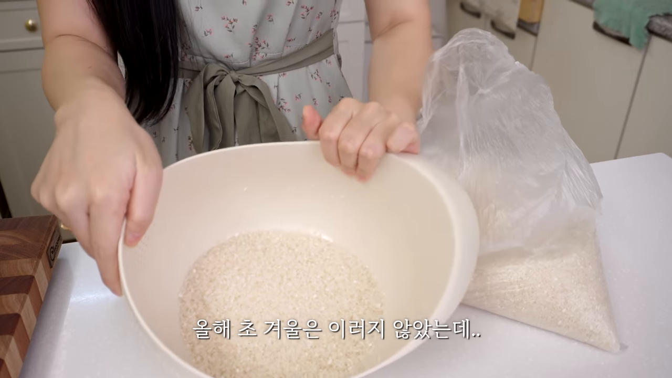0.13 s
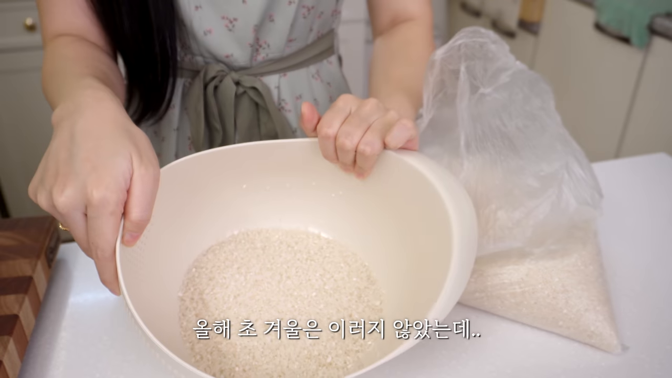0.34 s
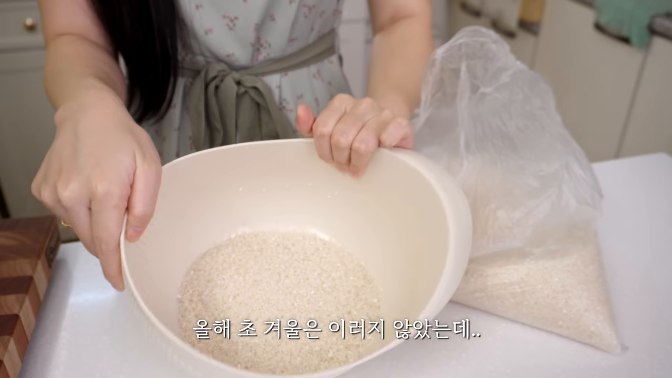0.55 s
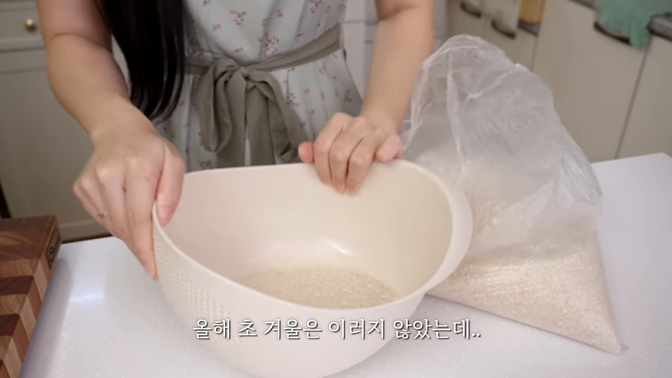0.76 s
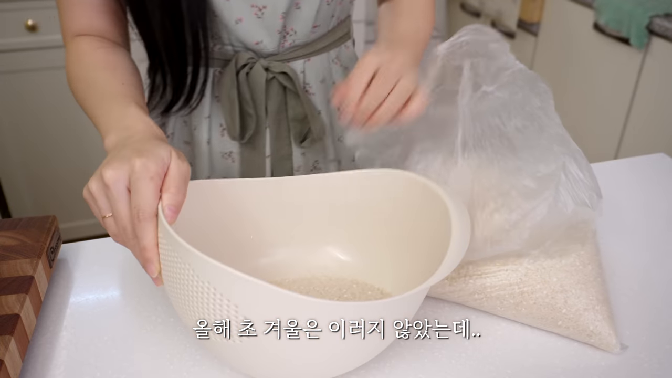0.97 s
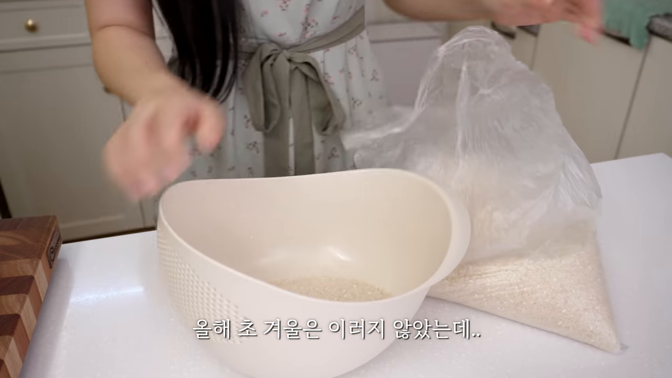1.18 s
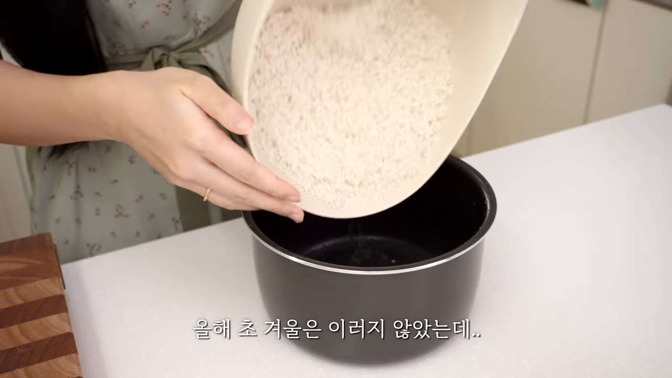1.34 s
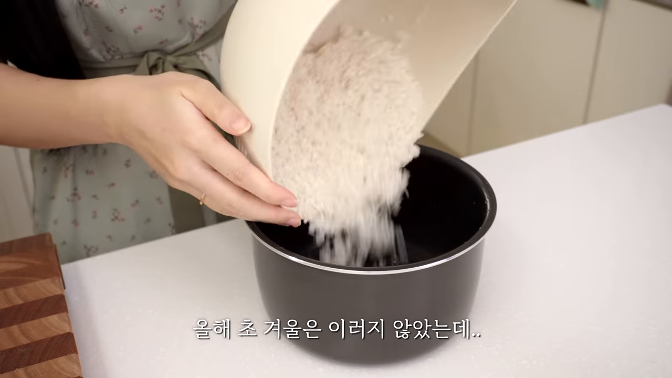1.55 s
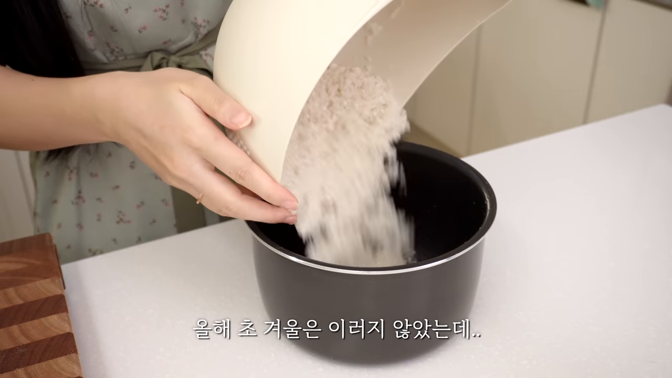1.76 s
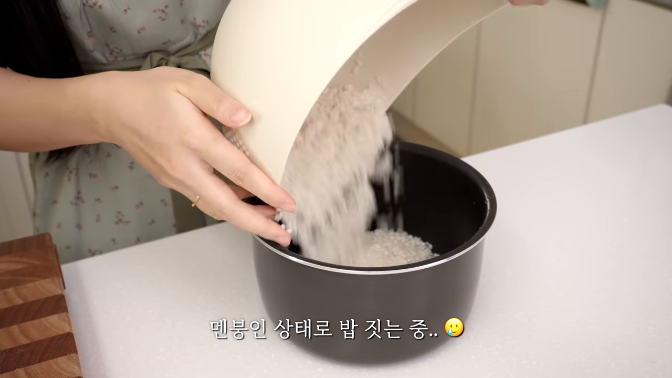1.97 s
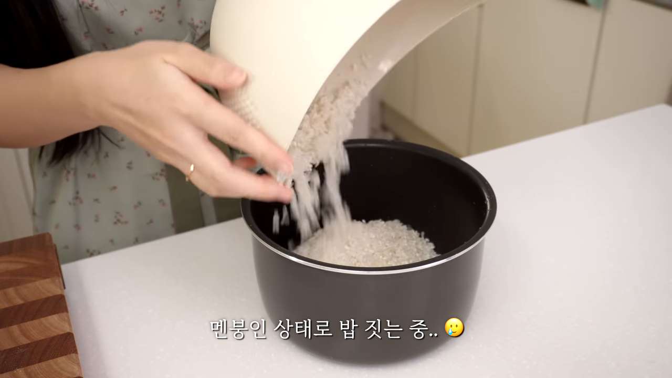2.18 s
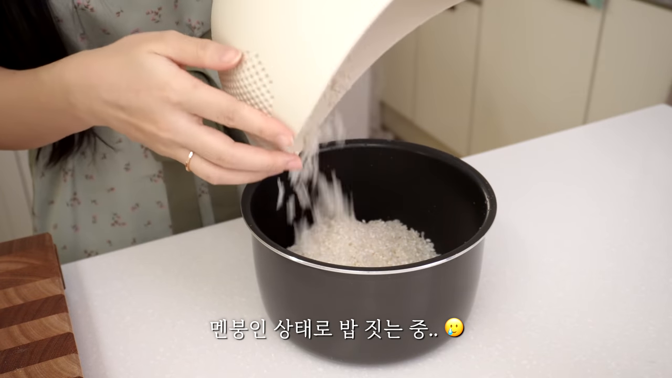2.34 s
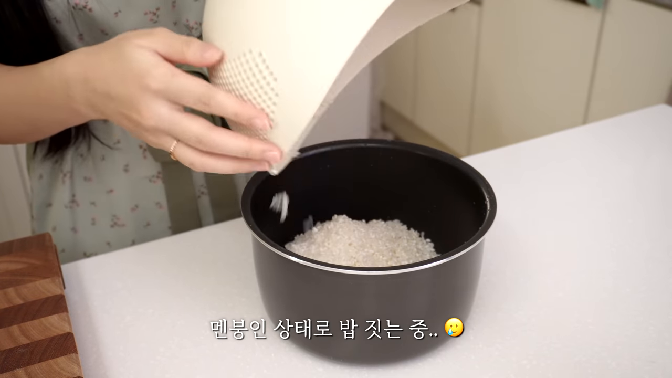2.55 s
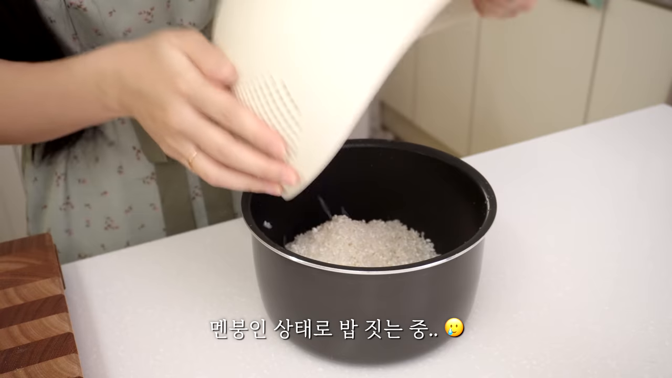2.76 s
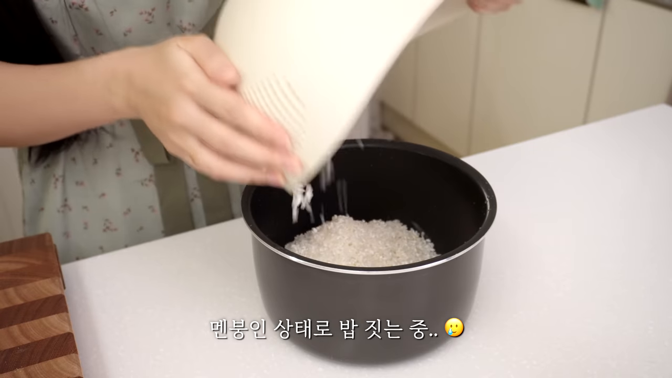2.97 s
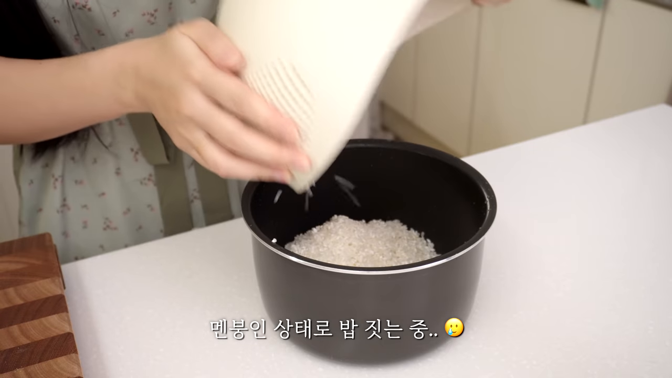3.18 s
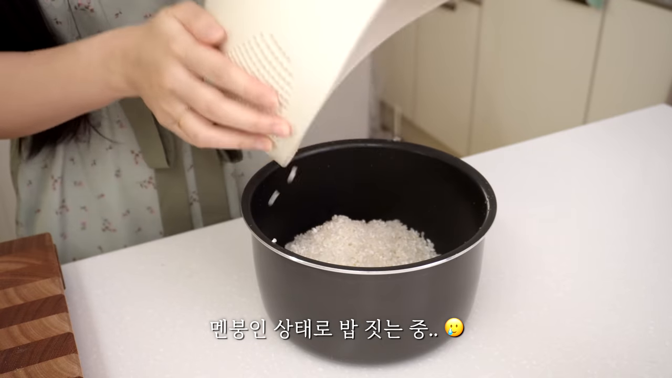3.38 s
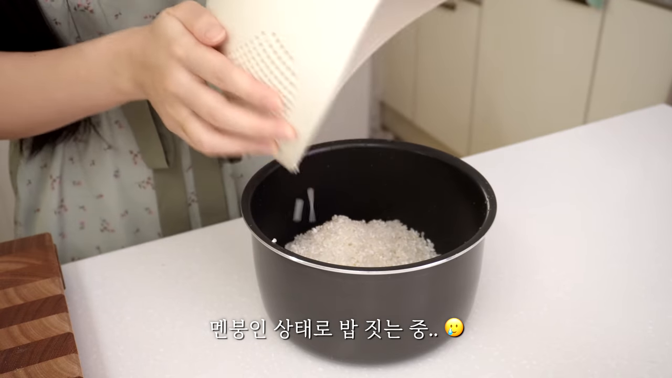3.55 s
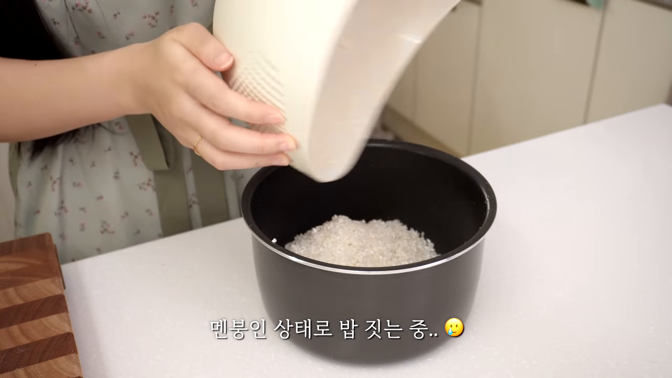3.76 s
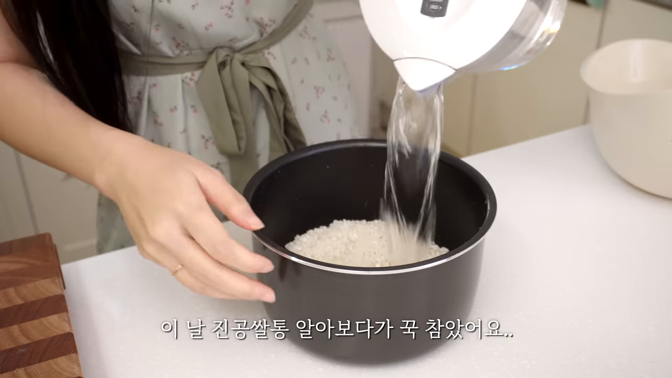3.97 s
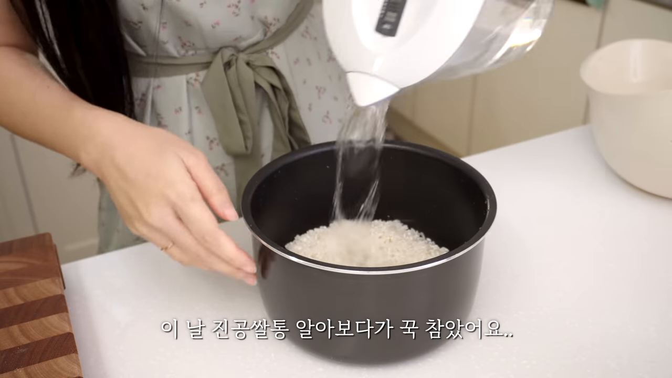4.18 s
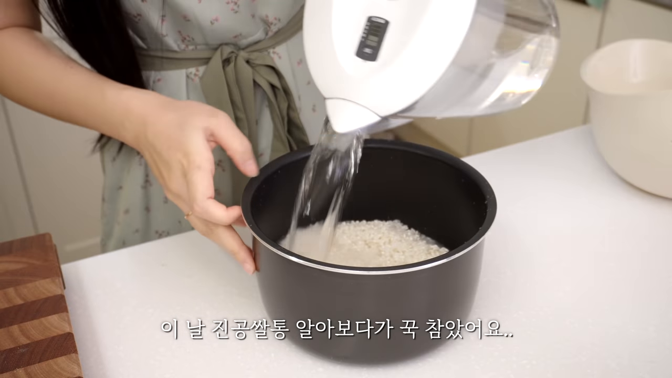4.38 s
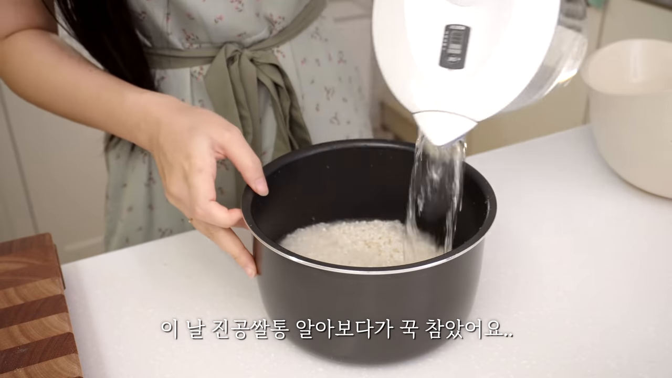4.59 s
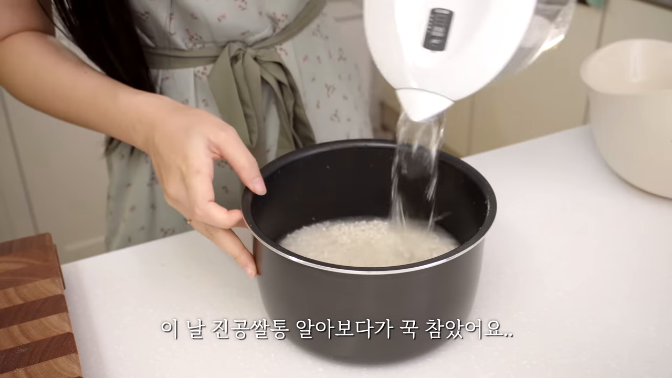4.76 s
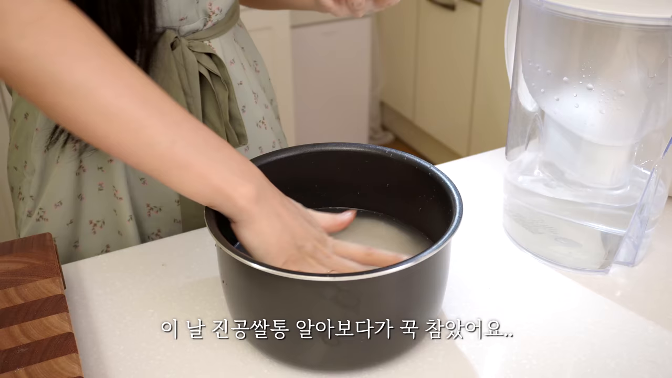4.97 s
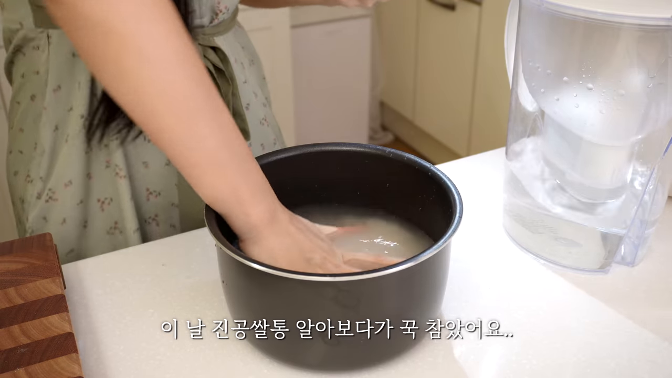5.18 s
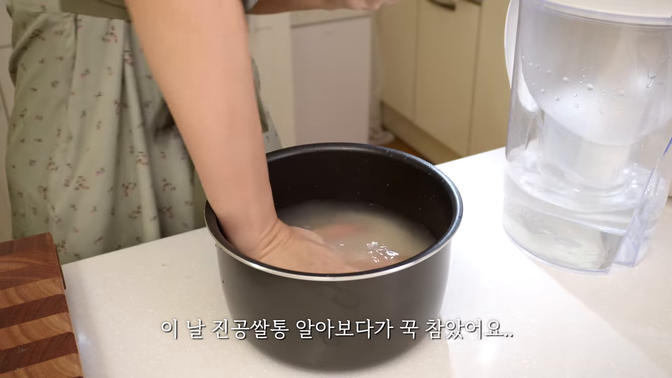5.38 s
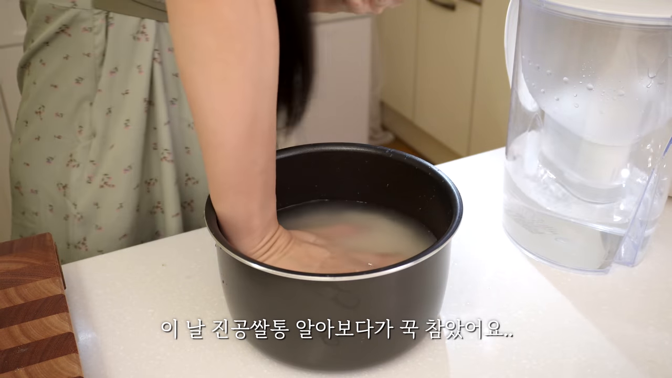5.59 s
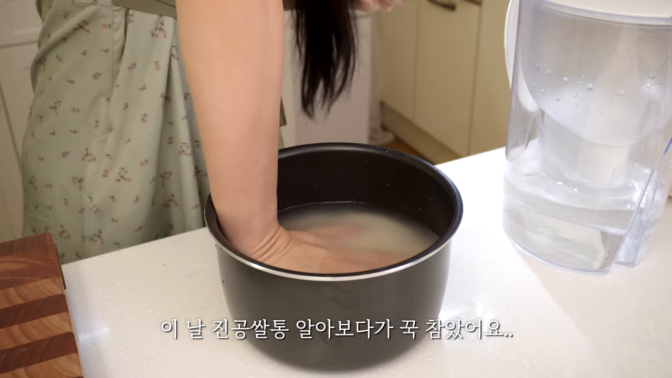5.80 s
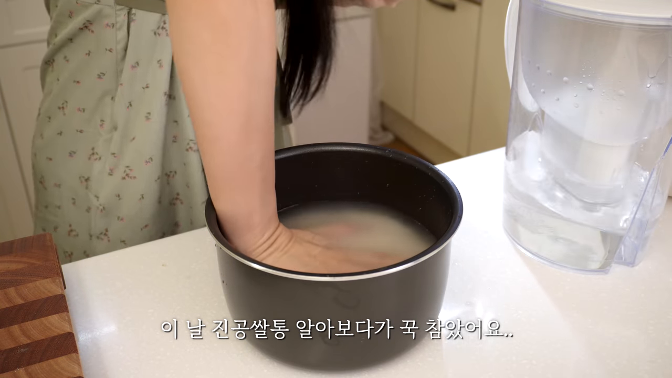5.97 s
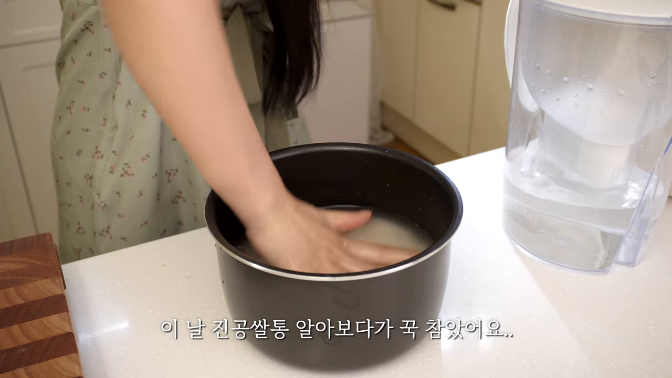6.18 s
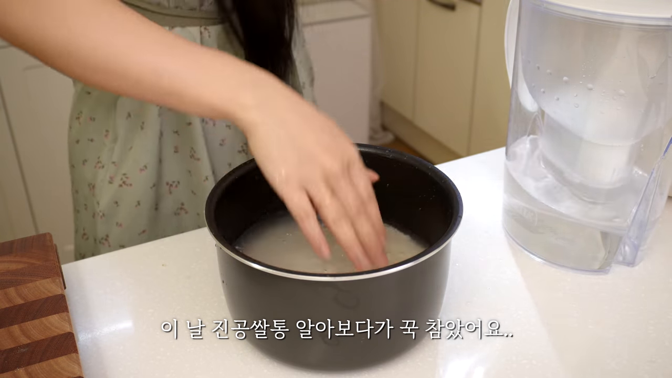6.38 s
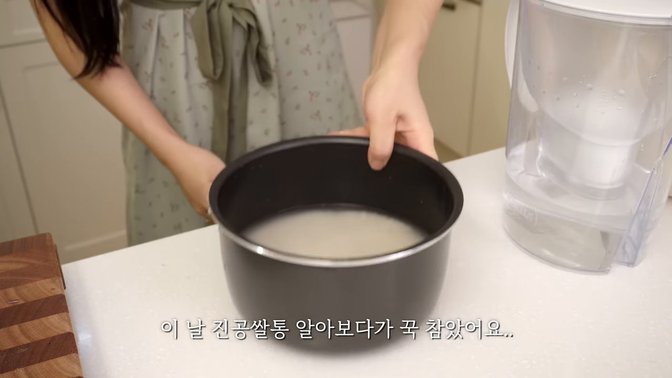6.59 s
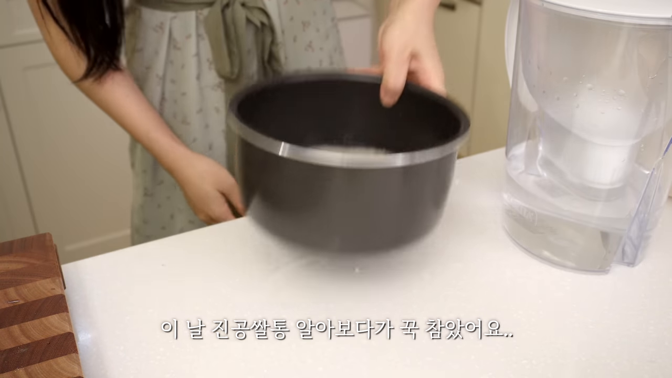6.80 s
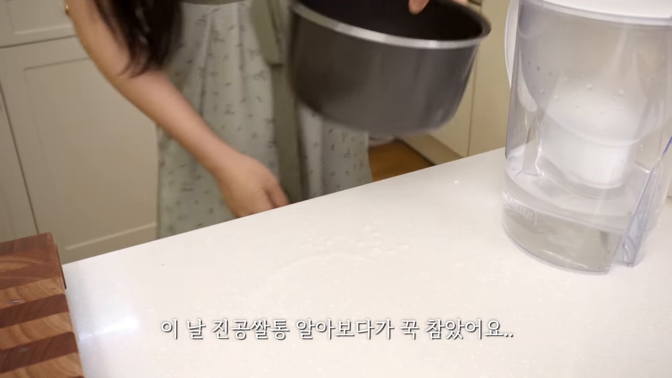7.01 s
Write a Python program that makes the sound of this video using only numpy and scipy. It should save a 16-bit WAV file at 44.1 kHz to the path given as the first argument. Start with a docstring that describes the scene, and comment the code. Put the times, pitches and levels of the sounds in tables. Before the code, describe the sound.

Close kitchen sounds: hissing rice grains, a plastic knock, a bright rice stream pinging in a pot, a bubbling water pour, then faint wet swishes.

```python
"""Over a soft appliance hum, dry rice slides and ticks in a plastic colander that knocks on the counter.
It is tipped into a metal pot: a stream of random impacts, thinning to single grains that ring wall modes.
A hard cut brings in water from a jug: fizzing impacts, ringing bubbles and short noise splashes.
Another ends it: a hand stirs the wet rice with soft noise strokes, and bubbles and snaps drip from it.
All but the hum gets the short reverberation of a small kitchen."""
import sys
import numpy as np
from scipy import signal
from scipy.fft import rfft, irfft, next_fast_len
from scipy.io import wavfile
from scipy.ndimage import uniform_filter1d

SR = 44100
rng = np.random.default_rng(int(sys.argv[2]) if len(sys.argv) > 2 else 0)


def wav_record(signal):
    """Record a signal, one row per channel, as 16-bit PCM in the file named by sys.argv[1]."""
    frames = np.transpose(np.atleast_2d(signal))
    bounded = np.clip(frames, -1, 1)
    # unit amplitude maps onto the largest positive 16-bit level
    quanta = np.round(bounded * 32767).astype(np.int16)
    wavfile.write(sys.argv[1], SR, quanta)


N = 310464
TIME = np.arange(N) / SR
AGE = np.arange(SR) / SR  # seconds since a blow

# Turning points in seconds: start, colander tipped, water in, water out, end.
TURNS_S = [0, 1.254, 3.837, 5.005, 7.1]
START_S, TIP_S, POUR_S, POUR_END_S = TURNS_S[:4]
LANDING_S, STREAM_S = 1.589, 0.92  # when the rice reaches the pot, and how long it runs


def amp(db):
    """Decibels to gain."""
    return 10 ** (np.asarray(db) / 20)


def unit(x):
    """Scale to rms 1."""
    return x / np.sqrt(np.mean(x ** 2) + 1e-20)


def fade(t, t60):
    """Exponential decay by 60 dB in t60 seconds."""
    return np.exp(-np.log(1000) * t / t60)


def along(points, hz):
    """Read (Hz, value) points on a log frequency axis."""
    f, v = np.transpose(points)
    return np.interp(np.log(hz + 1), np.log(f), v)


def filtered(x, response):
    """Multiply the spectrum of x by a response of frequency."""
    size = next_fast_len(len(x) + 4096)
    hz = np.fft.rfftfreq(size, 1 / SR)
    return irfft(rfft(x, size) * response(hz), size)[:len(x)]


def coloured(x, spectrum):
    """Shape x with a (Hz, dB) spectrum, at rms 1."""
    return unit(filtered(x, lambda hz: amp(along(spectrum, hz))))


def resonance(hz, centre, width):
    """Response of one damped mode."""
    return 1j * hz * width / (centre ** 2 - hz ** 2 + 1j * hz * width)


def above(x, edge_hz):
    """A steep causal high-pass."""
    return signal.sosfilt(signal.butter(4, edge_hz, "high", fs=SR, output="sos"), x)


def add(track, s, sound):
    """Mix a sound into a track at time s."""
    part = track[max(round(s * SR), 0):][:len(sound)]
    part += sound[:len(part)]


def between(start, end):
    """Open only between two moments."""
    return (TIME >= start) & (TIME < end)


def swell(s, length, rise_s, fall_db_per_s):
    """Gain of one movement: it rises from s, holds until its length is up, then dies away."""
    age = TIME - s
    rise = np.clip(age / rise_s, 0, 1)
    return rise * amp(-abs(fall_db_per_s) * np.maximum(age - length, 0))


def together(gains):
    """Unrelated movements add in power."""
    return np.sqrt(sum(g ** 2 for g in gains))


def impacts(rate, spread_db):
    """Tiny collisions of random size, rate a second; even in power whatever the rate."""
    hit = rng.random(N) < rate / SR
    size_db = spread_db * np.minimum(rng.standard_normal(N), 2)
    size = np.sign(rng.standard_normal(N)) * amp(size_db)
    return unit(hit * size / np.sqrt(rate + 1))


def snap(centre_hz, q, t60):
    """A brief contact with a peak near 1, ringing around one frequency."""
    t = AGE[:SR // 20]
    burst = rng.standard_normal(len(t)) * fade(t, t60)
    x = filtered(burst, lambda hz: resonance(hz, centre_hz, centre_hz / q) ** 2)
    return x / np.sqrt(2 * np.pi * np.abs(uniform_filter1d(x ** 2, size=64)).max())


def bubble(hz, cycles, rise):
    """An air bubble rings for some cycles, rising in pitch as it nears the surface."""
    life = cycles / hz
    t = AGE[:int(life * SR) + 2]
    tone = np.sin(2 * np.pi * hz * t * (1 + rise * t / life / 2))
    return tone * fade(t, life) * (1 - np.exp(-2 * hz * t))


# How long the room rings. Each row: frequency in Hz, decay by 60 dB in seconds.
KITCHEN_DECAY = [(150, 0.2), (1000, 0.31), (4000, 0.15), (14000, 0.12)]


def in_kitchen(x, wet_db):
    """Add the answer of the walls, each frequency dying at its own speed."""
    hz, t, z = signal.stft(rng.standard_normal(SR // 2), SR, nperseg=256)
    decaying = z * fade(t, along(KITCHEN_DECAY, hz)[:, None])
    tail = signal.istft(decaying, SR, nperseg=256)[1]
    tail = np.pad(tail, (round(.005 * SR), 0))  # 5 ms pre-delay
    return x + amp(wet_db) * signal.fftconvolve(x, tail / np.linalg.norm(tail))[:N]


# Colour of the ventilation noise. Each row: frequency in Hz, relative level in dB.
AIR_SPECTRUM = [(12, -29.5), (20, -5), (177, -8), (210, -6), (277, -3.5), (367, -6), (574, -7),
                (738, -11.5), (825, -10.5), (976, -14.5), (1220, -12.5), (1610, -19), (14300, -30.5),
                (16000, -45.5)]
# Partials of the appliance hum. Each row: frequency in Hz, relative level in dB.
HUM_PARTIALS = [(263.8, -65), (576.0, -71.5)]


def room_tone():
    """Ventilation is coloured noise; narrow noise bands make an appliance's slightly unsteady hum."""
    hum = np.zeros(N)
    for centre, db in HUM_PARTIALS:
        band = filtered(rng.standard_normal(N), lambda hz: resonance(hz, centre, 9) ** 2)
        hum += amp(db) * unit(band)
    return amp(-57.5) * coloured(rng.standard_normal(N), AIR_SPECTRUM) + amp(0.5) * hum


# Jolts of the colander that set the rice sliding. Each row: start in seconds, rise in seconds,
# length in seconds, hiss level in dB, wall rub level in dB, dying away of the hiss in dB per second.
SLIDE_JOLTS = [(-0.01, 0.0078, 0.032, -24, -28.5, 78.5), (0.47, 0.043, 0.49, -48, -58, 100),
               (0.63, 0.14, 0.27, -37, -37, 220), (0.951, 0.0087, 0.18, -31, -36, 179.5)]
RUB_DIES_FASTER = 1.39  # the heap stops rubbing before its loose grains stop rolling
# Colour of grains rolling on grains. Each row: frequency in Hz, relative level in dB.
HISS_SPECTRUM = [(1940, -36), (3300, -6), (5630, -3.5), (7010, -6.5), (8210, -1), (9430, -4),
                 (10300, -14.5), (13300, -7.5), (15300, -17), (16000, -19)]
# Colour of grains rubbing the plastic. Each row: frequency in Hz, relative level in dB.
RUB_SPECTRUM = [(76, -45.5), (130, -18), (156, -9), (189, -15.5), (323, -11.5), (617, -3), (1040, -6.5),
                (1550, -4), (1810, -4), (3500, -9), (4550, -37.5), (7700, -120)]
# Modes of the tilted colander's wall. Each row: frequency in Hz, a third of the bandwidth in Hz,
# relative level in dB.
TILTED_WALL = [(627, 41, 0.5), (1620, 120, -3), (2480, 290, -16.5)]
# tipping: the hiss grows as the slope steepens, the rub on the wall stays even
TIP_HISS_DB, TIP_GROWS_DB_PER_S, TIP_RUB_DB = -47, 19, -40.5


def sliding_rice():
    """Grains rub each other and the plastic wall; more of them move when the sound is strong."""
    hiss = together(amp(db) * swell(s, length, rise, fall) for s, rise, length, db, _, fall in SLIDE_JOLTS)
    rub = together(amp(db) * swell(s, length, rise, RUB_DIES_FASTER * fall)
                   for s, rise, length, _, db, fall in SLIDE_JOLTS)
    out = hiss * coloured(impacts(1200 + 300000 * hiss, spread_db=6.5), HISS_SPECTRUM)
    out += rub * coloured(impacts(4000, spread_db=3.0), RUB_SPECTRUM)
    # tilted in the air, the wall is free to resonate
    tilted = swell(TIP_S, LANDING_S - TIP_S, rise_s=0.018, fall_db_per_s=400.5)
    tip_hiss = tilted * amp(TIP_HISS_DB + TIP_GROWS_DB_PER_S * (TIME - TIP_S))
    out += tip_hiss * coloured(impacts(2700, spread_db=7), HISS_SPECTRUM)
    grains = impacts(4000, spread_db=0)
    wall = unit(filtered(grains, lambda hz: sum(amp(db) * resonance(hz, c, 3 * w) for c, w, db in TILTED_WALL)))
    tip_rub = amp(-5.5) * coloured(grains, RUB_SPECTRUM) + amp(-2) * wall
    return out + tilted * amp(TIP_RUB_DB) * tip_rub


# The hardest grains snapping against the colander. Each row: start in seconds, peak in dB, centre in Hz.
GRAIN_TICKS = [(0.085, -7.5, 8150), (0.1346, -8, 8180), (0.177, -15, 8800), (0.2998, -18, 9700),
               (0.401, -13.5, 9100), (0.4144, -20, 8200), (0.5403, -24, 8260), (0.6079, -12.5, 7900),
               (0.6197, -16, 8370), (0.817, -14, 8300), (1.1882, -16, 8700), (1.4186, -19, 2600),
               (1.499, -20.5, 5800), (1.5282, -15.5, 4660), (3.3368, -13.5, 12400)]
SOFT_TICKS_S, SOFT_TICK_DB, SOFT_TICK_HZ = (0.24, 0.58), -21.5, 8250  # lighter, as the heap comes to rest
# The stiff rim clacking on the counter. Each row: start in seconds, peak in dB, centre in Hz.
RIM_CLACKS = [(0.690, -14, 510), (0.9597, -0.5, 3740), (0.9586, -8.5, 10100), (0.9585, -5, 1620),
              (0.966, -11.5, 1650), (0.974, -6.5, 1580)]
# The bowl knocking the counter. Each row: start in seconds, relative thud level in dB,
# extra level of the lowest mode in dB.
COUNTER_KNOCKS = [(0.690, -25.5, 10.5), (0.96, -28.5, -16)]
# Modes of the bowl. Each row: frequency in Hz, relative level in dB, decay by 60 dB in seconds.
BOWL_MODES = [(87, -6, 0.23), (113, -3.5, 0.18), (159.2, 7, 0.23), (230, 0.5, 0.13), (346, 6, 0.06),
              (600, -31, 0.041)]


def colander():
    """Loose grains tick against the plastic; set down, it clacks and its bowl thuds."""
    ticks, thuds, clacks = np.zeros((3, N))
    start, end = SOFT_TICKS_S
    soft = [(start + when * (end - start), SOFT_TICK_DB + 8 * (size - .5), SOFT_TICK_HZ * 2 ** ((pitch - .5) / 2))
            for when, size, pitch in rng.random((5, 3))]
    for s, db, hz in list(GRAIN_TICKS) + soft:
        add(ticks, s, amp(db) * snap(hz, q=0.96, t60=0.017))
    for s, db, hz in RIM_CLACKS:
        add(clacks, s, amp(db) * snap(hz, q=1.47, t60=0.005))
    for s, thud_db, low_db in COUNTER_KNOCKS:
        for k, (hz, db, t60) in enumerate(BOWL_MODES):
            gain = (-1) ** k * amp(thud_db + db - 8.0 + low_db * (k == 0))
            add(thuds, s, gain * np.sin(2 * np.pi * hz * AGE) * fade(AGE, t60))
    return above(ticks, edge_hz=2570) + above(thuds, edge_hz=26) + clacks


# Lumps of rice that drop with the stream. Each row: start in seconds, level over the stream in dB.
STREAM_LUMPS = [(1.589, 6.5), (1.726, 3), (1.825, 2.5), (2.06, 4), (2.11, 0)]
LUMP_S, LUMP_FALL_DB_PER_S = 0.026, 123  # length; fall of the envelope that scales a lump's dB
# the stream lands all at once, then thins steadily as the colander empties
STREAM_DB, STREAM_THINS_DB_PER_S, BOTTOM_DB, BOTTOM_DAMPS_DB_PER_S = -18.5, 25.5, -32.5, 29
# Colour of grains on the pot. Each row: frequency in Hz, relative level in dB.
PATTER_SPECTRUM = [(880, -37.5), (1500, -40.5), (1670, -14.5), (1830, -6.5), (2860, -10), (3060, -8.5),
                   (4040, -6.5), (4420, -10), (5940, -2.5), (7170, -6.5), (8160, 0.5), (10300, -10.5),
                   (13100, -5), (15200, -13.5), (16000, -19.5)]
# Colour of the low drumming on the pot's bottom. Each row: frequency in Hz, relative level in dB.
BOTTOM_SPECTRUM = [(71, -44.5), (120, -17.5), (149, -11.5), (237, -18.5), (310, -8), (571, -10), (626, -1),
                   (817, -11.5), (983, -5), (1180, 0.5), (1440, -6.5), (1900, -12.5), (2470, -35.5),
                   (4180, -120)]
# Pot modes under the falling rice. Each row: frequency in Hz, relative level in dB.
LOADED_POT_MODES = [(1163, -53.5), (1787, -51.5), (4947, -45.5), (5868, -41.5), (6164, -50.5),
                    (6573, -49.5), (7887, -32), (8204, -41.5), (8312, -23), (8570, -51.5), (8748, -62),
                    (8974, -26), (9846, -62), (10831, -53.5), (11585, -51.5), (11892, -72.5),
                    (12252, -51.5), (13356, -52.5)]


def rice_stream():
    """Thousands of grains drum on the pot, sliding off the rim in clumps; the heap damps its walls."""
    lumps = amp(sum(db * swell(s, LUMP_S, 0.0043, LUMP_FALL_DB_PER_S) for s, db in STREAM_LUMPS))
    flow = lumps * swell(LANDING_S, STREAM_S, rise_s=0.007, fall_db_per_s=199)
    age = np.maximum(TIME - LANDING_S, 0)
    patter = flow * amp(STREAM_DB - STREAM_THINS_DB_PER_S * age)
    bottom = flow * amp(BOTTOM_DB - BOTTOM_DAMPS_DB_PER_S * age)
    # the flow flutters around 25 times a second
    flutter = unit(filtered(rng.standard_normal(N), lambda hz: resonance(hz, 24.6, 22) ** 2))
    clumps = amp(1.6 * flutter)
    grains = impacts(4500 + 70000 * patter, spread_db=2.5)
    hard_grains = impacts(600 + 15000 * patter, spread_db=4.5)
    walls = unit(filtered(hard_grains, lambda hz: sum(amp(db) * resonance(hz, c, 65) for c, db in LOADED_POT_MODES)))
    top = patter * (amp(-2.0) * coloured(grains, PATTER_SPECTRUM) + amp(-9) * walls * clumps)
    # the air in the pot gives the drumming a hollow note
    hollow = unit(filtered(impacts(3000, spread_db=7.5), lambda hz: resonance(hz, 1170, 170) ** 2))
    drumming = coloured(impacts(3500, spread_db=-2.0), BOTTOM_SPECTRUM)
    low = bottom * (amp(-2.5) * drumming + amp(-8) * hollow)
    return clumps * (top + low)


# The hardest single grains striking the pot. Each row: start in seconds, relative peak in dB,
# relative treble in dB.
STRAY_GRAINS = [(2.262, -24, -13), (2.3838, -13.5, -21), (2.4459, -15, -13), (2.476, -18, 0),
                (2.4925, -11, -15), (2.6534, -18.5, -28.5), (2.6698, -17.5, -15), (2.795, -16.5, -11),
                (2.9356, -15.5, -26), (2.9713, -14, -10), (3.0164, -9, -11), (3.078, -14, -15),
                (3.109, -15, -18), (3.16, -18, -12), (3.1804, -5.5, -19), (3.236, -22, -6),
                (3.3367, -18.5, -20), (3.4167, -15, -8), (3.435, -7.5, -4), (3.455, -14, -19),
                (3.5544, -21, -18), (3.6696, -16.5, -15.5), (3.7828, -16, -7), (3.803, -20, -7)]
TRICKLE_S = (1.8, 3.28)  # lighter grains keep bouncing off the wall between these times
# The pot's wall modes. Each row: frequency in Hz, relative level in dB.
POT_MODES = [(990.5, -59.5), (1793, -50.5), (2649, -58), (3424, -56), (4156, -58.5), (4910, -57),
             (5712, -56.5), (5879, -61), (6089, -51.5), (6686, -52.5), (7381, -75), (7989, -45.5),
             (8355, -89.5), (8457, -75), (8506, -101), (8565, -50), (8985, -56), (9857, -55), (10121, -70),
             (10734, -55), (11305, -61), (11553, -51.5), (12586, -49.5), (12629, -63), (12726, -78),
             (13517, -69)]
# How long the pot rings. Each row: frequency in Hz, decay by 60 dB in seconds.
POT_DECAY = [(1000, 2), (1800, 0.91), (3500, 0.3), (8000, 0.15), (13000, 0.067)]
# Colour of a grain's contact. Each row: frequency in Hz, relative level in dB.
PING_SPECTRUM = [(1470, -57), (2500, -43), (2720, -9), (3130, -30), (3360, -5), (3660, -14), (4240, -19),
                 (5190, -15), (5870, 4), (7080, -10.5), (8200, 9), (10300, -12), (13100, -5.5),
                 (14900, -7.5), (16000, -43)]


def stray_grains():
    """Each grain gives a short bright ping and rings the wall modes at new strengths."""
    out = np.zeros(N)
    hz, db = np.transpose(POT_MODES)
    t60 = along(POT_DECAY, hz)
    modes = np.sin(2 * np.pi * hz[:, None] * AGE) * fade(AGE, t60[:, None])
    weight = amp(db) / np.sqrt(t60)
    weight = weight / np.linalg.norm(weight)
    # the low modes hardly feel how hard a grain hits
    hardness = np.clip(hz / 5800, 0, 1)
    usual_db = np.mean(np.transpose(STRAY_GRAINS)[2])
    t = AGE[:SR // 10]
    ping_shape = fade(t, 0.043) * (1 - np.exp(-t / 0.00094))
    start, end = TRICKLE_S
    chance = rng.random((60, 3))
    times = start + chance[:, 0] * (end - start)
    # grains bounce harder while the stream is heavy
    sizes_db = np.interp(times, (start, 2.6), (-22, -35)) + 11 * chance[:, 1]
    trickle = list(zip(times, sizes_db, usual_db + 8 * (chance[:, 2] - .5)))
    for s, peak_db, treble_db in list(STRAY_GRAINS) + trickle:
        # a short contact is bright, a glancing one dull
        colour = lambda f: amp(0.66 * (treble_db - usual_db) * np.log2(np.maximum(f, 4500) / 8000))
        spot_db = 4 * np.clip(rng.standard_normal(len(hz)), -2, 1)  # each grain hits another spot
        strength = colour(hz) * amp(-41.5 + (peak_db + 25) * hardness + spot_db)
        add(out, s, (weight * strength * np.sign(rng.standard_normal(len(hz)))) @ modes)
        ping = filtered(coloured(rng.standard_normal(len(t)), PING_SPECTRUM), colour)
        add(out, s, amp(peak_db - 10) * ping * ping_shape)
    return out


# Shakes that loosen the last rice. Each row: start in seconds, length in seconds, level in dB.
LOOSENING_SHAKES = [(2.37, 0.05, -52), (2.68, 0.097, -38.5), (2.835, 0.05, -26.5), (2.965, 0.065, -32.5),
                    (3.1, 0.087, -38), (3.26, 0.011, -39.5), (3.33, 0.0083, -36), (3.48, 0.052, -47.5),
                    (3.78, 0.055, -43)]
SHAKE_RISE_S, SHAKE_FALL_DB_PER_S = 0.0059, 200
CLINGING_S, CLINGING_DB = (2.25, 3.66), -53  # a few grains creep down the wall all the while
# Colour of the rustle. Each row: frequency in Hz, relative level in dB.
RUSTLE_SPECTRUM = [(290, -38), (500, -15.5), (1460, -11.5), (2260, -1.5), (5630, -8.5), (6610, -9.5),
                   (8580, -4.5), (10800, -13.5), (14500, -9), (16000, -32)]
POT_SINGS_DB = -12.5  # the lowest wall modes, relative to the rice shaken onto them


def last_rice():
    """Shakes rustle the nearly empty colander; what drops keeps the pot's lowest modes singing."""
    start, end = CLINGING_S
    shakes = list(LOOSENING_SHAKES) + [(start, end - start, CLINGING_DB)]
    flow = together(amp(db) * swell(s, length, SHAKE_RISE_S, SHAKE_FALL_DB_PER_S) for s, length, db in shakes)
    rustle = flow * coloured(impacts(700 + 50000 * flow, spread_db=4.5), RUSTLE_SPECTRUM)
    drops = impacts(500, spread_db=1) * np.minimum(flow, amp(-43.5))
    ring = sum(amp(db) * np.sin(2 * np.pi * hz * AGE) * fade(AGE, along(POT_DECAY, hz))
               for hz, db in POT_MODES[:2])
    return rustle + amp(POT_SINGS_DB) * signal.fftconvolve(drops, ring / np.linalg.norm(ring))[:N]


def bubbles(count, low_hz, high_hz, cycles):
    """A cloud of bubbles of all sizes while the jug pours."""
    cloud = np.zeros(N)
    for when, size, strength in rng.random((count, 3)):
        s = POUR_S + when * (POUR_END_S - POUR_S)
        hz = low_hz * (high_hz / low_hz) ** size
        add(cloud, s, amp(13.5 * strength ** 2) * bubble(hz, cycles, 0.197))
    return cloud


def echoed(x, t60):
    """Quick reflections inside the pot."""
    t = AGE[:SR // 10]
    ring = rng.standard_normal(len(t)) * fade(t, t60)
    return signal.fftconvolve(x, ring / np.linalg.norm(ring))[:N]


# Spray of the water jet. Each row: time in seconds, relative level in dB.
JET_SPRAY = [(3.86, -31), (3.932, -23.5), (3.992, -29.5), (4.098, -29), (4.65, -31), (4.662, -36),
             (4.914, -27.5), (4.99, -32.5)]
SPRAY_DB = -0.5  # trim on the whole spray
# The jet swinging through standing water. Each row: time at its height in seconds, length in seconds,
# level in dB.
JET_CHURNS = [(3.933, 0.13, -24), (4.116, 0.22, -27), (4.52, 0.27, -34), (4.933, 0.17, -37)]
CALM_DB = -54.5  # gurgle between the swings
# Note of the hollow under the jet. Each row: time in seconds, frequency in Hz.
JET_HOLLOW = [(3.85, 3950), (4.1, 3560), (4.4, 3500), (4.8, 3180), (5.0, 3130)]
# Colour of the fizz and fine bubbles. Each row: frequency in Hz, relative level in dB.
SPRAY_SPECTRUM = [(880, -5), (1500, 1), (1640, -11), (1880, -16.5), (2740, -11), (3620, -1), (4160, -4.5),
                  (5660, 2.5), (6960, -4), (8660, 1.5), (10300, -10), (13100, -5.5), (16000, -8)]
# Colour of the wash and coarse bubbles. Each row: frequency in Hz, relative level in dB.
GURGLE_SPECTRUM = [(71, -49.5), (120, 2), (237, 2), (326, 2), (396, -24), (486, -6), (736, 1), (1640, -2.5),
                   (2200, 11), (2860, -26), (4840, -120)]
# The largest air pockets collapsing under the jet, heard 1 to 2 ms after the listed time.
# Each row: time in seconds, relative peak in dB, frequency in Hz.
AIR_POCKETS = [(3.869, -19, 1230), (3.982, -10, 722), (4.084, -17.5, 760), (4.145, -22, 600),
               (4.241, -14, 1014), (4.386, -18.5, 2160), (4.421, -15, 1900), (4.486, -19.5, 733),
               (4.536, -20, 1380), (4.65, -16.5, 2230), (4.817, -18.5, 1470), (4.882, -12.5, 1130),
               (4.969, -15, 1270)]
# The sharpest splashes, heard 1 ms after the listed time.
# Each row: time in seconds, relative peak in dB, centre in Hz.
SHARP_SPLASHES = [(3.8466, -5, 8400), (3.8823, -3, 3130), (3.925, -3, 4000), (4.1079, 1, 4070),
                  (4.1292, 2.5, 3880), (4.264, -7.5, 7100), (4.3615, -9.5, 3430), (4.4351, -3.5, 5270),
                  (4.5216, -3, 3450), (4.8216, 0, 4270), (4.9039, 1, 4940), (4.9557, -4, 5230)]


def water():
    """The jet fizzes on the rice, traps bubbles and throws splashes; the pot wall echoes them."""
    spray = amp(SPRAY_DB + np.interp(TIME, *np.transpose(JET_SPRAY)))
    churns = [amp(db) * np.cos(np.pi * np.clip((TIME - s) / length, -.5, .5)) ** 2
              for s, length, db in JET_CHURNS]
    gurgle = together(churns + [amp(CALM_DB)])
    duty = np.sqrt((POUR_END_S - POUR_S) * SR / N)  # keeps the clouds at rms 1 while they sound
    fizz = amp(-8.5) * coloured(impacts(3000, spread_db=10.0), SPRAY_SPECTRUM)
    fine_cloud = bubbles(count=4500, low_hz=1800, high_hz=13160, cycles=132)
    fine = amp(-1.0) * duty * coloured(fine_cloud, SPRAY_SPECTRUM)
    wash = amp(-22) * coloured(impacts(2000, spread_db=0.5), GURGLE_SPECTRUM)
    coarse_cloud = bubbles(count=360, low_hz=437, high_hz=2413, cycles=46)
    coarse = amp(-6.0) * duty * coloured(coarse_cloud, GURGLE_SPECTRUM)
    # drops ring the hollow under the jet, whose note sinks as the water deepens
    phase = 2 * np.pi * np.cumsum(np.interp(TIME, *np.transpose(JET_HOLLOW))) / SR
    drops = filtered(impacts(150, spread_db=13), lambda hz: 1 / (1 + 1j * hz / 140) ** 2)
    hollow = amp(-14.5) * unit(drops * np.sin(phase))
    out = spray * (fizz + fine + hollow) + gurgle * (wash + coarse)
    for s, db, hz in AIR_POCKETS:
        add(out, s + 0.00104, amp(db - 0.5) * snap(hz, q=1.3, t60=0.013))
        add(out, s + 0.00202, amp(db - 13) * bubble(hz, cycles=43, rise=0.18))
    for s, db, hz in SHARP_SPLASHES:
        add(out, s + 0.00099, amp(db - 8.5) * snap(hz, q=1.0, t60=0.023))
    return above(out + amp(-7) * echoed(out, t60=0.029), edge_hz=110)


# Strokes of the hand in the wet rice, then on the pot. Each row: start in seconds, rise in seconds,
# length in seconds, level in dB, dying away in dB per second.
HAND_STROKES = [(4.993, 0.02, 0.16, -53.5, 25), (5.92, 0.093, 0.17, -63, 34.5),
                (6.23, 0.029, 0.31, -55, 89.5), (6.819, 0.027, 0.03, -55, 93)]
# Colour of the strokes. Each row: frequency in Hz, relative level in dB.
SWISH_SPECTRUM = [(410, -28), (700, -13), (971, -3), (1460, -6.5), (2160, -4), (2770, -5.5), (8420, -4.5),
                  (13500, -19), (16000, -18)]
SLOSH_S, SLOSH_DB = 6.54, -55.5  # the water rocks back once the hand is out
# Drips from the lifted hand. Each row: start in seconds, relative peak in dB, frequency in Hz.
HAND_DRIPS = [(6.231, -35, 1800), (6.2413, -22.5, 2210), (6.243, -24.5, 1297), (6.262, -29, 2190),
              (6.290, -25.5, 1910), (6.417, -35, 10400), (6.436, -27.5, 4830), (6.479, -31, 7430)]


def wet_hand():
    """The palm stirs the wet rice, lifts and drips, then takes up the pot."""
    swish = together(amp(db) * swell(s, length, rise, fall) for s, rise, length, db, fall in HAND_STROKES)
    out = swish * coloured(impacts(3500, spread_db=4.0), SWISH_SPECTRUM)
    slosh = amp(SLOSH_DB) * swell(SLOSH_S, length=0.04, rise_s=0.022, fall_db_per_s=350)
    out += slosh * coloured(impacts(2000, spread_db=4), BOTTOM_SPECTRUM)
    for s, db, hz in HAND_DRIPS:
        add(out, s, amp(db - 5.5) * bubble(hz, cycles=73, rise=0.09))
        add(out, s, amp(db - 2.5) * snap(hz, q=4.5, t60=0.031))
    return out


def scene():
    """Rice gives way to water at a hard cut, water to the hand at another; the room tone runs through."""
    in_colander = in_kitchen(colander() + sliding_rice() + last_rice(), wet_db=-11.5)
    in_pot = in_kitchen(rice_stream() + stray_grains(), wet_db=-12.5)
    rice = (in_colander + in_pot) * between(START_S, POUR_S)
    pour = in_kitchen(water(), wet_db=-15) * between(POUR_S, POUR_END_S)
    hand = in_kitchen(wet_hand(), wet_db=-8.0)
    return (rice + pour + hand + room_tone())[None]


TOP_HZ = 15850  # middle of the 200 Hz wide upper band edge


def record(dry):
    """Round off the very loudest peaks and keep nothing above the band edge."""
    rounded = dry / (1 + np.abs(dry / .85) ** 6) ** (1 / 6)
    return np.array([filtered(x, lambda hz: np.clip((TOP_HZ - hz) / 200 + .5, 0, 1)) for x in rounded])


dry = scene()
out = record(dry)
wav_record(out)
```